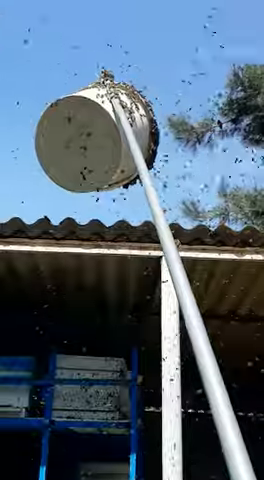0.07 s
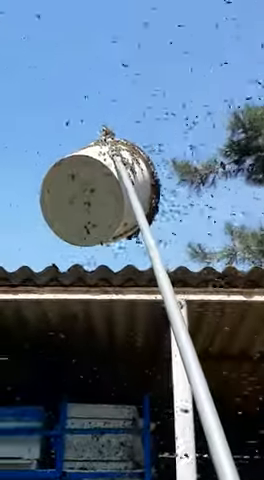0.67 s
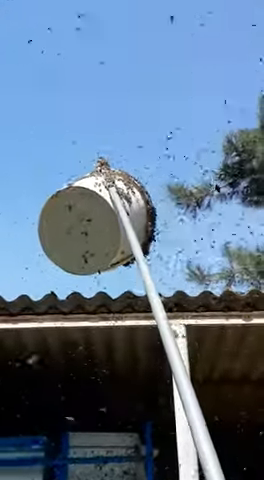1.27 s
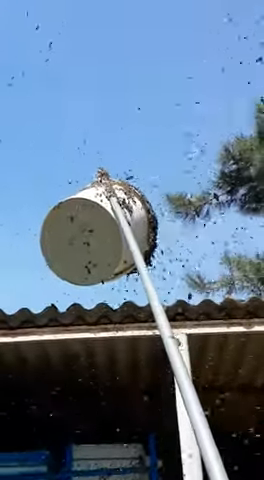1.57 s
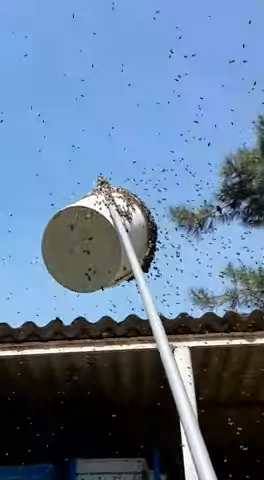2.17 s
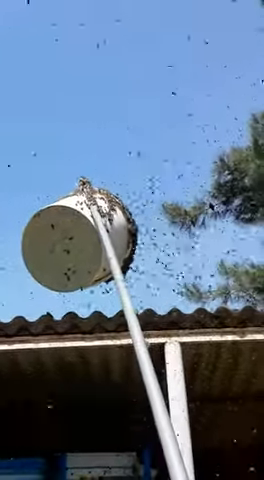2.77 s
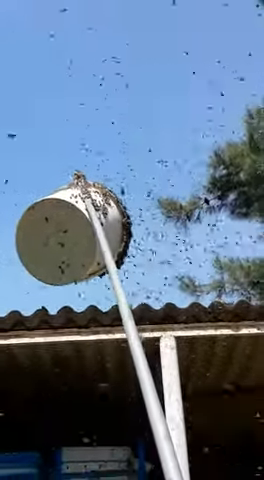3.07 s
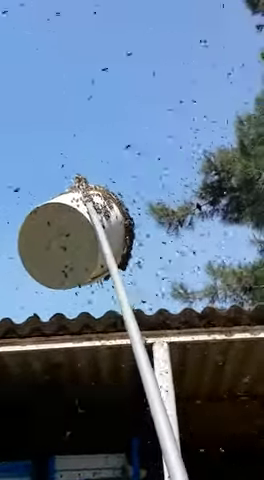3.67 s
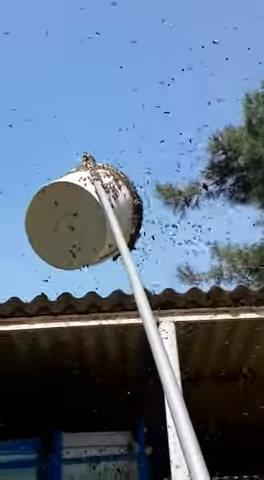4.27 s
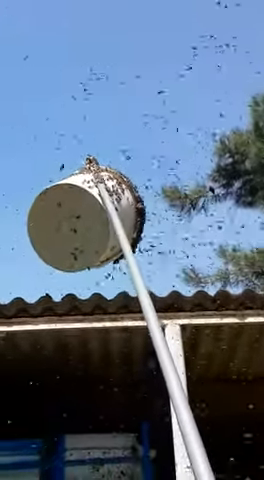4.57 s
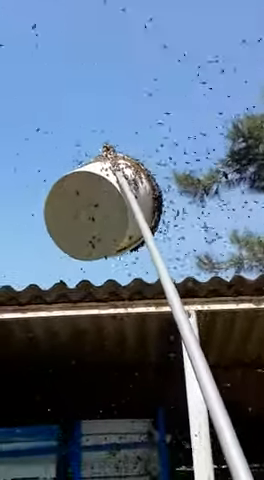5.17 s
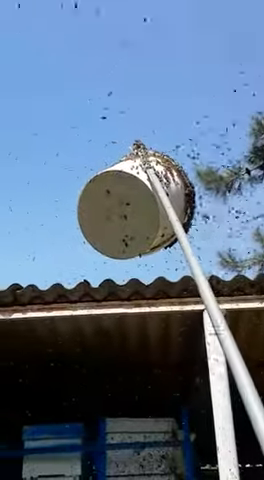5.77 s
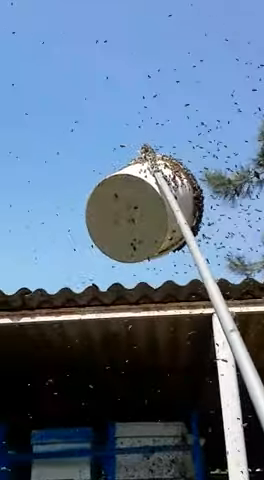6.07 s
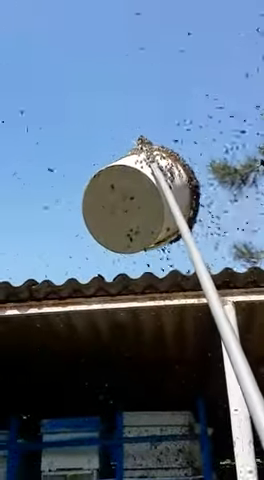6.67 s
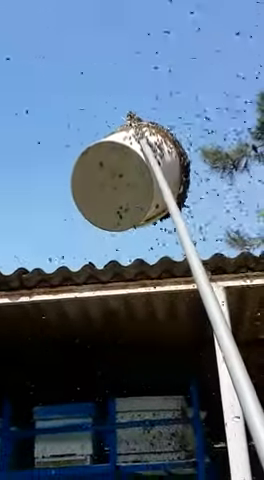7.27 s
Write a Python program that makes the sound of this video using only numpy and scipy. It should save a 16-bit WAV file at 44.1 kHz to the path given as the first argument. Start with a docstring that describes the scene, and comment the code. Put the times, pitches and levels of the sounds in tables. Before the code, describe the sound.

Small birds chirp over the continuous buzz of many flying bees, with a few microphone taps and soft gusts of wind.

```python
"""After a short silence the recorder fades in on honeybees circling a bucket on a pole beside a shed:
their periodic wingbeats sum to a hum. A small bird repeats a two-note chirp, a gliding whistle roughened
by reflections, while sparrows twitter in the pines. Early on, lone bees fly past and the first of a few
taps lands on the right microphone port. Midway, bees swing close, and the turbulent pressure of a light
breeze buffets and thumps first the left port, then, towards the end, the right."""
import sys
import numpy as np
from scipy import signal
from scipy.fft import rfft, irfft, next_fast_len
from scipy.io import wavfile
from scipy.ndimage import uniform_filter1d, map_coordinates

SR = 44100
rng = np.random.default_rng(int(sys.argv[2]) if len(sys.argv) > 2 else 0)


def transcribe(signal):
    """Save signal, clipped to [-1, 1], as a 16-bit WAV file at the path in sys.argv[1]."""
    frames = np.atleast_2d(signal).T
    limited = np.clip(frames, -1, 1)
    pcm = np.round(limited * 32767).astype(np.int16)
    wavfile.write(sys.argv[1], SR, pcm)


N = 331632
LEFT, RIGHT = "left", "right"


def amp(db):
    """Amplitude grows tenfold for every 20 decibels."""
    return 10 ** (np.asarray(db) / 20)


def unit(x):
    """Normalisation to an rms of 1."""
    return x / np.sqrt(np.mean(x ** 2) + 1e-20)


def along(points, hz):
    """Interpolation of (frequency_hz, value) points on a logarithmic frequency axis."""
    frequencies, values = np.transpose(points)
    return np.interp(np.log(hz + 1), np.log(frequencies + 1), values)


def curves(rows):
    """Linear interpolation in time: one value per sample for each column after the first."""
    times, *columns = np.transpose(rows)
    return [np.interp(np.arange(N) / SR, times, column) for column in columns]


def wobble(rate, size=N):
    """Smooth random modulation: a spline through `rate` knots a second, over the whole scene."""
    knots = rng.standard_normal(1024)
    return map_coordinates(knots, [np.linspace(0, rate * N / SR, size)], mode="mirror")


def filtered(x, response):
    """Linear filtering: the spectrum is multiplied by a frequency response."""
    size = next_fast_len(N + SR // 4, True)
    return irfft(rfft(x, size) * response(np.fft.rfftfreq(size, 1 / SR)), size)[..., :N]


def panned(lean_db):
    """A level difference, left minus right, is split evenly between the ports."""
    return amp(np.array([[.5], [-.5]]) * lean_db)


def add(track, start_s, sound):
    """Superposition: a sound adds to the track from start_s on."""
    part = track[..., max(round(start_s * SR), 0):][..., :sound.shape[-1]]
    part += sound[..., :part.shape[-1]]


def surround(pair, spectrum, right_lag_s=.00008):
    """Diffuse field: two unrelated signals become alike at the ports where the wavelength is long."""
    # likeness of the two ports: frequency_hz, coherence
    coherence = [(60, 1), (280, 0.9), (900, 0.72), (1500, 0.21), (3000, 0.021)]
    # imbalance of the field: frequency_hz, left_minus_right_db
    lean = [(200, -1.5), (700, 1), (1300, -0.5), (2400, -7), (4400, 0.5), (8000, 5.5), (15000, 2.5)]

    def mid_side(hz):
        angle = np.arccos(np.clip(along(coherence, hz), -1, 1)) / 2
        return amp(along(spectrum, hz)) * [np.cos(angle), np.sin(angle)]

    def direction(hz):
        return panned(along(lean, hz)) * np.exp(-2j * np.pi * hz * [[0], [right_lag_s]])

    mid, side = filtered(pair, mid_side)
    return unit(filtered(np.array([mid + side, mid - side]), direction))


def yard(x, size=256):
    """Reverberation: shed and trees scatter a different tail to each port, the treble dying first."""
    # time to decay by 60 dB: frequency_hz, t60_s
    decay = [(500, 0.57), (4000, 0.36), (8000, 0.15)]
    hz, t, spectra = signal.stft(rng.standard_normal((2, SR // 3)), SR, nperseg=size)
    tail = signal.istft(spectra * amp(-60 * t / along(decay, hz)[:, None]), SR, nperseg=size)[1]
    return signal.fftconvolve(x[None], tail / np.linalg.norm(tail[0]), axes=1)


def open_air():
    """Ambient noise: a steady broadband hush arrives from all sides."""
    # spectrum of the hush: frequency_hz, density_db
    hush = [(25, -7.5), (100, -2), (330, 0.5), (600, 4.5), (1000, -5.5), (2500, -7), (4000, -0.5),
            (5500, -13), (7300, -15.5), (15500, -18)]
    return amp(-40.5) * surround(rng.standard_normal((2, N)), hush)


def slide(from_hz, to_hz, attack_s, release_s, ends_db=-12):
    """A glide, loudest in its middle, as a contour: time_s, pitch_hz, level_db."""
    return [(-attack_s, from_hz, ends_db), (0, np.sqrt(from_hz * to_hz), 0), (release_s, to_hz, ends_db)]


def chirp(t, contour, levels_db, rasp, edge_s=.002, flutter_db=3, rough_floor=.42):
    """Random frequency and amplitude modulation roughen a whistle that glides along a contour."""
    # low, middle and top register, one for each of levels_db: pitch_hz
    registers = [3000, 3900, 5500]
    times, hz, db = np.transpose(contour)
    times = np.sort(times) * np.exp(.0703 * rng.standard_normal())  # no two notes last equally long
    log_pitches = np.log(hz) + .01402 * rng.standard_normal(len(hz))
    glide = np.exp(np.interp(t, times, log_pitches))
    quiver = np.interp(t, np.linspace(t[0], t[-1], 200), rng.standard_normal(200))
    flutter = np.interp(t, np.linspace(t[0], t[-1], 50), rng.standard_normal(50))
    roughness = rough_floor + (1 - rough_floor) * np.exp(-((glide - 4200) / 1000) ** 2)
    pitch = glide * np.exp(rasp * quiver * roughness)
    edges = np.clip(np.minimum(t - times[0], times[-1] - t) / edge_s, 0, 1)
    level_db = np.interp(t, times, db) + np.interp(glide, registers, levels_db)
    envelope = edges * amp(level_db + flutter_db * flutter * roughness)
    return envelope * np.sin(2 * np.pi * np.cumsum(pitch) / SR)


def far_flock(level_db=-45.5, centre_hz=4100, spread=.24, sweep=.13, count=190):
    """Reverberation smears the short, harsh glides of distant sparrows into an unbroken twitter."""
    track, t = np.zeros(N), np.arange(-SR // 20, SR // 20) / SR
    for turn, (late, pitch, slope) in enumerate(rng.uniform(-1, 1, (count, 3))):
        hz, bend = centre_hz * np.exp(spread * pitch), np.exp(sweep * slope)
        contour = slide(hz * bend, hz / bend, attack_s=.0142, release_s=.0255)
        add(track, (turn + late) * N / SR / count, chirp(t, contour, [0] * 3, rasp=.0597))
    return amp(level_db) * unit(yard(track)[:, :N])


def bird_notes(notes, rasp, lean_db, echo_db, reverb_db, right_lag_s):
    """Interference: quick reflections from roof and ground make each chirped note flutter."""
    out, t = np.zeros((2, N)), np.arange(-.08, .1, 1 / SR)
    high_pass = signal.butter(4, 3000, "high", fs=SR, output="sos")  # mostly the treble is scattered
    for time_s, contour, levels_db in notes:
        start_s = time_s + t[0]
        note = chirp(t, contour, levels_db, rasp)
        scattered = signal.sosfilt(high_pass, note)
        add(out, start_s, amp(reverb_db) * yard(scattered))
        for port, gain, lag_s in zip(out, panned(lean_db), (0, right_lag_s)):
            add(port, start_s + lag_s, gain * note)
            for delay_s in rng.uniform(.002, .024, 7):
                add(port, start_s + delay_s, gain * amp(echo_db) * scattered)
    return out


def far_birds():
    """Single glides from farther off: the deeper the frequency modulation, the buzzier the note."""
    # thin falling whistles: time_s, level_db
    whistles = [(1.715, -29.5), (4.622, -28.5), (5.575, -32.5)]
    # short cheeps: time_s, level_db, from_hz, to_hz
    cheeps = [(.682, -42, 4470, 3950), (1.4, -40.5, 4300, 3070), (2.245, -34, 3960, 3000),
              (3.395, -38, 2900, 4100), (3.455, -38, 4420, 3150), (3.826, -37, 2770, 4420),
              (4.168, -36, 3450, 3000), (5.035, -36, 3900, 3030), (5.79, -38, 3490, 4330),
              (5.9, -38, 4400, 3074), (6.14, -37, 3990, 4600), (6.187, -38, 4450, 2940),
              (6.669, -35.5, 3750, 3290), (7.0, -37.5, 4220, 4800), (7.42, -33.5, 4200, 3070)]
    # buzzy rising rasps: time_s, level_db, pitch_hz
    rasps = [(1.345, -42, 4530), (2.28, -37.5, 4830), (2.682, -37, 5170), (3.2, -37.5, 4300),
             (4.93, -42, 4790), (5.26, -38.5, 5230), (5.74, -39.5, 4650), (6.208, -39.5, 5100),
             (6.931, -41, 5340), (7.309, -40.5, 5300)]
    thin = [(s, slide(5600, 4610, .055, .033), [db] * 3) for s, db in whistles]
    short = [(s, slide(from_hz, to_hz, .025, .0294), [db] * 3) for s, db, from_hz, to_hz in cheeps]
    buzzy = [(s, slide(hz * .96, hz * 1.07, .045, .0806), [db] * 3) for s, db, hz in rasps]
    return (bird_notes(thin, rasp=.042, lean_db=3.5, echo_db=-12.5, reverb_db=-10, right_lag_s=.0001)
            + bird_notes(short, rasp=.086, lean_db=-11.5, echo_db=-16, reverb_db=-1.5, right_lag_s=.00028)
            + bird_notes(buzzy, rasp=.12, lean_db=3, echo_db=-25, reverb_db=2.5, right_lag_s=.00029))


def near_bird(flick_db=-33):
    """Frequency modulation: each of two notes flicks up, slurs down, hiccups and ends low."""
    # first note: time_from_accent_s, pitch_hz, level_db
    lead = [(-.03, 4500, 0), (-.023, 6400, -4.5), (-.016, 5400, -3), (-.007, 4450, 3), (.005, 3900, 1.5),
            (.02, 3450, -5.5), (.038, 3200, -17), (.049, 4000, -4.5), (.056, 2950, -0.5), (.08, 2670, -3.5)]
    # second note: time_from_accent_s, pitch_hz, level_db
    reply = [(-.034, 4485, -16), (-.016, 5200, -9), (-.003, 4200, 0), (.009, 3656, -4.5),
             (.018, 4220, -1.5), (.025, 2950, -3.5), (.036, 2788, -1), (.055, 2746, -7)]
    # two-note calls: time_s, lead_db, lead_ending_extra_db, gap_s, reply_db, reply_ending_extra_db
    calls = [(0.313, -36, 0, 0.13, -34, -1), (0.766, -31, -2.5, 0.13, -30.5, 0),
             (1.102, -29, -2, 0.13, -28.5, -3.5), (1.502, -27, -7, 0.094, -32, -4),
             (1.983, -30.5, -4, 0.13, -30.5, -10), (2.392, -30.5, -3, 0.13, -31.5, 1),
             (2.769, -31, -2.5, 0.13, -30.5, -1), (3.19, -35, -9, .14, -32.5, 0),
             (3.582, -31.5, -6, 0.13, -32.5, 1.5), (3.956, -29.5, -6.5, 0.13, -28.5, -6),
             (4.408, -30.5, -12, 0.09, -30.5, -10), (4.834, -36, 0, 0.13, -37.5, 3),
             (5.347, -33.5, -7, 0.1, -32, -7), (6.322, -31, -4.5, 0.12, -30, -3),
             (6.727, -31, 5.5, 0.12, -29, 2), (7.108, -31, -2.5, 0.13, -29.5, -2)]
    leads = [(s, lead, (db + end_db, db, flick_db)) for s, db, end_db, *_ in calls]
    replies = [(s + gap_s, reply, (db + end_db, db, db)) for s, _, _, gap_s, db, end_db in calls]
    return (bird_notes(leads, rasp=.0683, lean_db=-4, echo_db=-14.5, reverb_db=-3, right_lag_s=.00027)
            + bird_notes(replies, rasp=.0845, lean_db=-3.5, echo_db=-10.5, reverb_db=-3.5,
                         right_lag_s=.00028))


def port_resonance(song, centre_hz=3960, half_width_hz=146, peak_db=4):
    """A resonance of the microphone ports lifts a narrow band of the chirps."""
    return filtered(song, lambda hz: amp(peak_db / (1 + ((hz - centre_hz) / half_width_hz) ** 2)))


def buffet(spectrum, window=1200):
    """Turbulent pressure: unrelated noise at each port, its power evened out over about 30 ms."""
    noise = unit(filtered(rng.standard_normal((2, N)), lambda hz: amp(along(spectrum, hz))))
    return noise / np.sqrt(np.abs(uniform_filter1d(noise ** 2, window)) + .0076)


def breeze(crossover_db=-23, eddy_db=3.5, eddies_per_s=40):
    """Turbulence: gusts add their power to the light air, and stronger flow reaches higher in pitch."""
    # light air between gusts: time_s, left_db, right_db
    light_air = [(.6, -40, -41), (2.7, -52.5, -48), (3.5, -35.5, -34.5), (4.7, -40.5, -45), (5.6, -47, -44),
                 (6.4, -37.5, -34.5), (6.8, -52, -30.5), (7.5, -44, -28.5)]
    # gusts on one port: peak_s, level_db, length_s, port
    gusts = [(1.127, -34.5, 0.078, LEFT), (2.146, -32.5, 0.037, LEFT), (2.262, -26, 0.022, LEFT),
             (3.238, -26.5, 0.035, LEFT), (3.501, -32.5, 0.058, LEFT), (3.898, -16, 0.015, LEFT),
             (3.915, -27, 0.036, RIGHT), (3.948, -20.5, 0.045, LEFT), (4.026, -31, 0.15, LEFT),
             (4.266, -25.5, 0.09, LEFT), (4.782, -32, 0.03, LEFT), (4.92, -29.5, 0.26, LEFT),
             (5.263, -31, 0.097, LEFT), (5.27, -21.5, 0.081, RIGHT), (5.358, -15, 0.081, RIGHT),
             (5.57, -22.5, 0.3, RIGHT), (5.657, -20, .03, RIGHT), (6.195, -26, 0.13, RIGHT),
             (6.532, -30, 0.066, LEFT), (6.542, -30.5, 0.053, RIGHT), (6.946, -29.5, 0.12, RIGHT),
             (7.188, -21, 0.022, RIGHT), (7.26, -23.5, 0.085, RIGHT), (7.495, -21, 0.051, RIGHT)]
    # spectrum of weak flow: frequency_hz, density_db
    weak = [(20, -59), (45, -18), (75, -1.5), (115, 1.5), (170, -4.5), (230, -8), (320, -58)]
    # spectrum of strong flow: frequency_hz, density_db
    strong = [(25, -54), (80, -20), (130, -1.5), (200, 3.5), (280, -4), (380, -12), (600, -21), (1500, -59)]
    t = np.arange(N) / SR
    power = amp(curves(light_air)) ** 2
    for peak_s, db, length_s, port in gusts:
        offset = 2 * np.abs(t - peak_s) / length_s
        power[int(port == RIGHT)] += amp(db) ** 2 * np.exp(-np.minimum(offset, 10) ** 2)
    force = np.sqrt(power)
    strong_share = 1 / (1 + (amp(crossover_db) / force) ** 2)
    eddies = amp(eddy_db * np.array([wobble(eddies_per_s), wobble(eddies_per_s)]))
    rumble = np.sqrt(1 - strong_share) * buffet(weak) + np.sqrt(strong_share) * buffet(strong)
    return force * eddies * rumble


def thumps(full_scale_hz=194, hz_per_db=3.5):
    """An eddy's low-pressure core crosses a port: one brief suction between two softer pushes."""
    # single eddies: time_s, peak_db, port
    eddies = [(2.262, -28, LEFT), (3.206, -12.5, LEFT), (3.528, -15.5, LEFT), (3.894, -3.5, LEFT),
              (3.913, -7.5, LEFT), (3.962, -13, LEFT), (4.171, -15, LEFT), (4.303, -15.5, RIGHT),
              (4.739, -13.5, LEFT), (4.772, -13, LEFT), (4.939, -12.5, LEFT), (5.279, -7.5, RIGHT),
              (5.36, -6.5, RIGHT), (5.39, -8, RIGHT), (5.4, -3.5, RIGHT), (5.452, -10, RIGHT),
              (5.663, -10, RIGHT), (6.174, -13, RIGHT), (6.526, -14, RIGHT), (6.918, -14.5, RIGHT),
              (7.177, -12, RIGHT), (7.193, -13, RIGHT), (7.296, -12, RIGHT), (7.494, -8, RIGHT)]
    out, t = np.zeros((2, N)), np.arange(-SR // 20, SR // 20) / SR
    for time_s, db, port in eddies:
        pitch_hz = full_scale_hz + hz_per_db * db  # weaker thumps are duller
        radius_squared = (np.pi * pitch_hz * t) ** 2
        pulse = (2 * radius_squared - 1) * np.exp(-radius_squared)
        add(out[int(port == RIGHT)], time_s + t[0], amp(db) * pulse)
    return out


def taps(rise_s=.00004, rebound_ratio=1.65, leak_db=-20.5):
    """A touch on the right port is a pressure impulse: a push, then a slower pull of equal area."""
    # touches on the port: start_s, push_db, fall_s
    touches = [(.516, -7.5, 0.00093), (0.8796, -7.5, 0.00074), (2.64, -15.5, 0.00057),
               (2.668, -13, 0.00084), (3.299, -10, 0.00087), (3.308, -9.5, 0.00082), (3.3279, -10, 0.00073),
               (3.37, -11, 0.00064), (5.198, -11, 0.0012), (5.228, -11.5, 0.0005)]
    right, t = np.zeros(N), np.arange(SR // 30) / SR
    for start_s, db, fall_s in touches:
        push = np.exp(-t / fall_s) * (1 - np.exp(-t / rise_s))
        pull = t * np.exp(-t / (rebound_ratio * fall_s))
        add(right, start_s, amp(db) * (push - pull * push.sum() / pull.sum()) / push.max())
    return np.array([amp(leak_db) * right, right])


def passing_bees(close_s=.1565, doppler_share=.04):
    """Doppler effect: a lone bee swells as it nears and sinks in pitch as it goes by."""
    # fly-bys: closest_s, level_db, wingbeat_hz
    passes = [(0.701, -42, 236.4), (0.922, -45, 257), (1.031, -45, 285), (1.78, -45, 251),
              (2.85, -47.5, 233)]
    # first four wingbeat harmonics: level_db
    harmonics = [-9, -1.5, -21, -16.5]
    track, t = np.zeros(N), np.arange(N) / SR
    for closest_s, db, wing_hz in passes:
        ahead = (closest_s - t) / close_s
        distance = np.hypot(1, ahead)
        pitch = wing_hz * (1 + doppler_share * ahead / distance + .0126 * wobble(14))
        phase = 2 * np.pi * np.cumsum(pitch) / SR
        buzz = sum(amp(tone_db) * np.sin(k * phase) for k, tone_db in enumerate(harmonics, 1))
        track += amp(db) / distance ** 2 * buzz
    return track


def bees(wing_hz, spread, drift, flutter, passing_db, count, size=2048):
    """Periodic wingbeats radiate harmonics; pitch and level wander as each bee turns, nears and leaves."""
    pair, steps, sample_steps = np.zeros((2, N)), np.arange(size), np.linspace(0, size - 1, N)
    for bee, detune in enumerate(np.linspace(-spread, spread, count)):
        harmonics = amp(rng.normal(0, 2, 26)) * np.exp(2j * np.pi * rng.random(26))
        stroke = unit(irfft(np.r_[0, harmonics], size))  # one wingbeat
        pitch = wing_hz * np.exp(detune + drift * wobble(2.2, size) + flutter * wobble(14, size))
        stroke_index = np.interp(sample_steps, steps, np.cumsum(pitch) * N / SR).astype(int) % size
        nearness = amp(1.24 * passing_db * np.tanh(wobble(1.7, size) / 2))
        pair[bee % 2] += np.interp(sample_steps, steps, nearness) * stroke[stroke_index]
    return pair


def swarm():
    """Incoherent summation blurs the crowd into a hum; brighter bees swing and hover on the right."""
    # swell of the whole swarm: time_s, relative_db
    crowd_swell = [(.7, -46), (1.6, -46.5), (2.8, -46), (3.5, -46), (4.3, -44), (5.9, -45.5), (7.5, -44.5)]
    # swell of the close bees: time_s, relative_db
    close_swell = [(.5, -55.5), (3.0, -52), (3.8, -49), (4.1, -40), (4.35, -37.3), (4.7, -43.5),
                   (5.2, -38.5), (5.5, -43.5), (6.1, -44), (6.5, -49)]
    # spectral envelope of the crowd: frequency_hz, gain_db
    crowd_tone = [(120, -8), (220, 0), (310, -4), (465, 1), (700, -8), (950, -2.26), (1400, -7),
                  (2000, -6.5), (2600, -11.5), (4000, -20.5), (5500, -13)]
    # spectral envelope of the close bees: frequency_hz, gain_db
    close_tone = [(200, 0), (480, -24), (700, 6), (950, 8.5), (1650, 6.5), (2100, 4.5), (2700, -25),
                  (5000, -34)]
    # spectral envelope of the hovering bees: frequency_hz, gain_db
    hover_tone = [(700, -13), (935, 5.5), (1170, -27), (1400, 6.5), (1640, -3), (1900, -27), (3500, -46)]
    crowd = bees(wing_hz=234.86, spread=.09, drift=.068, flutter=.017, passing_db=4.5, count=44)
    close = bees(wing_hz=228.1, spread=.12, drift=.08, flutter=.02, passing_db=2.5, count=16)
    hovering = bees(wing_hz=233, spread=.002, drift=.009, flutter=.00604, passing_db=.5, count=2)
    hum = amp(curves(crowd_swell)[0] + 9) * surround(crowd, crowd_tone)
    whine = surround(close, close_tone) + amp(-7.5) * surround(hovering, hover_tone)
    return hum + amp(curves(close_swell)[0]) * whine * panned(-10)


def scene():
    """Superposition: air, bees, birds and wind fade in together, and the taps add at full strength."""
    # the recorder's fade-in: time_s, gain_db
    fade = [(.37, -72), (.39, -26.5), (.44, -16.5), (.52, -11.5), (.6, -5), (.68, -3)]
    background = open_air() + far_flock()
    honeybees = swarm() + passing_bees()
    song = port_resonance(near_bird() + far_birds())
    wind = breeze() + thumps()
    return (background + honeybees + song + wind) * amp(curves(fade)[0]) + taps()


def record(dry, top_hz=15750):
    """Band limiting: the recorder keeps nothing above top_hz."""
    return filtered(dry, lambda hz: hz < top_hz)


dry = scene()
out = record(dry)
transcribe(out)
```